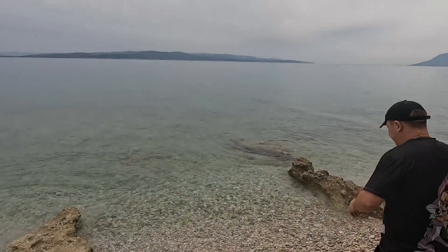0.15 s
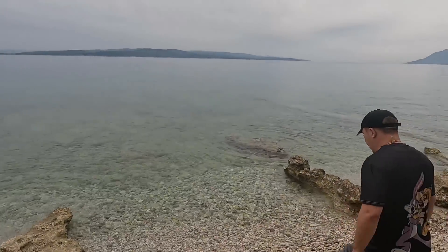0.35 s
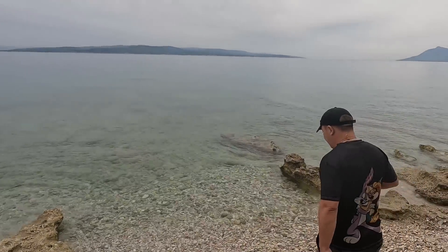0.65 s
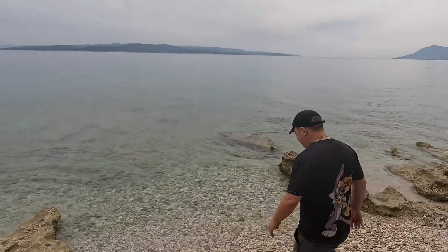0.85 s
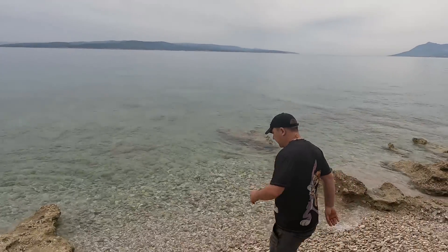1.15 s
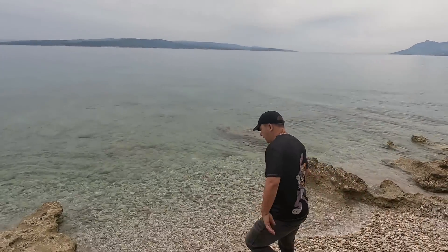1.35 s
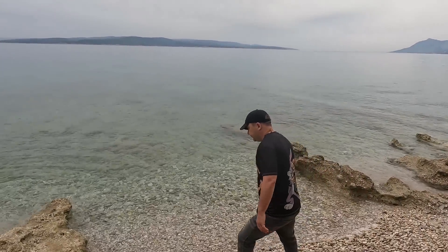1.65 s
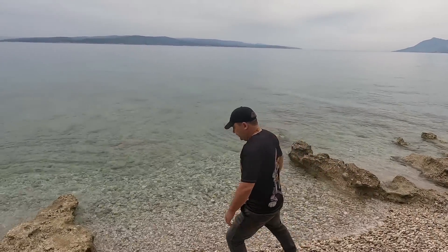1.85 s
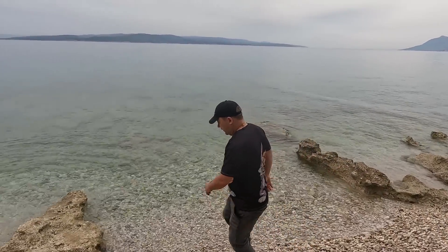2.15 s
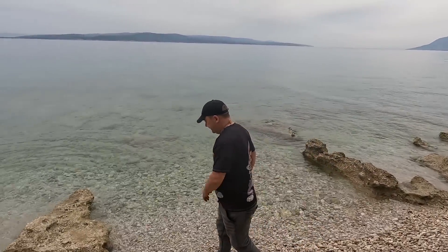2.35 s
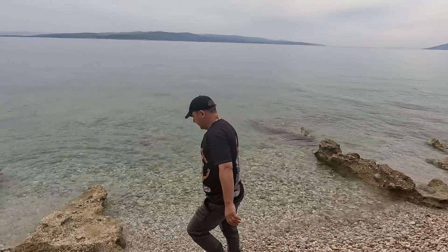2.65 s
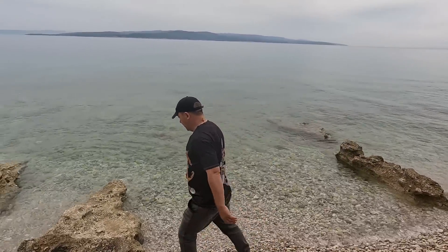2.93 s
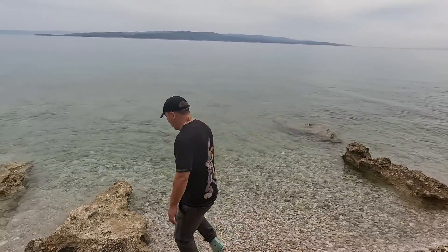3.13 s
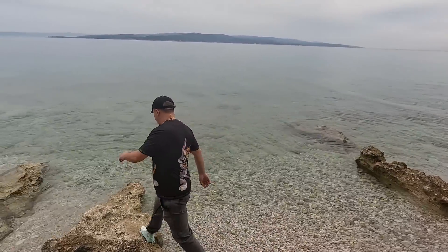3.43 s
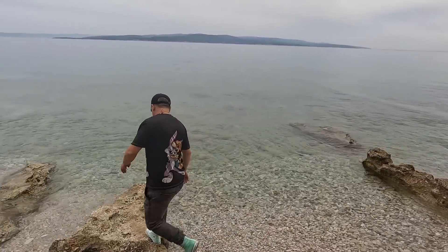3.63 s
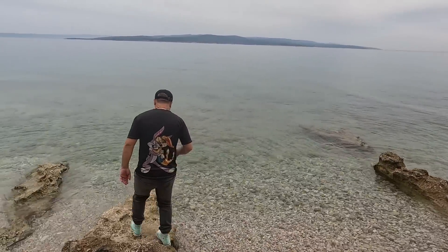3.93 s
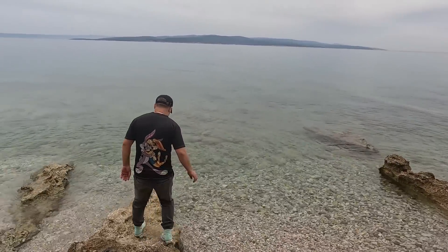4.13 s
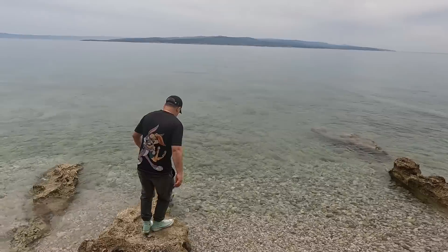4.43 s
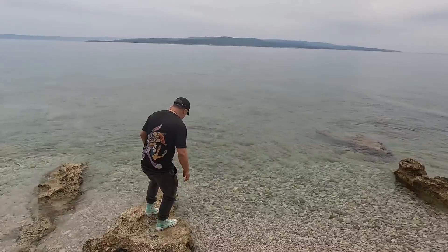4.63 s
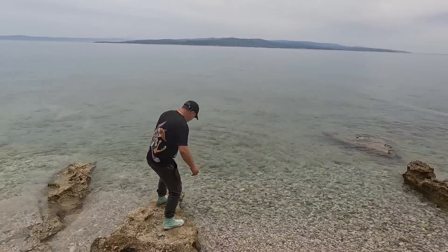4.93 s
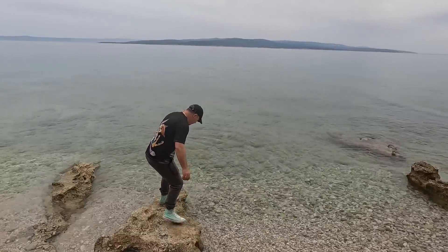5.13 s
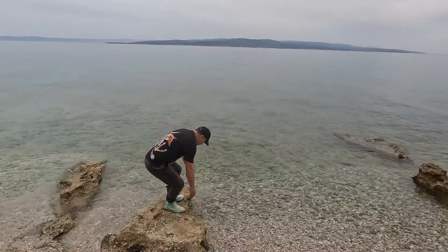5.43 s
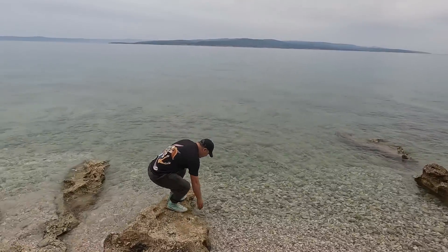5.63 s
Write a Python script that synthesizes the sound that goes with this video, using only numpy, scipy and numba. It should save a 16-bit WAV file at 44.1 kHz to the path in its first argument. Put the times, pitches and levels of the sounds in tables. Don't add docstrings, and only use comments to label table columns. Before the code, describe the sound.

Outdoors at the edge of a calm sea, heard through a small stereo camera. From 0 to about 2.7 seconds, shoes crunch busily over loose pebbles: dense, bright gritty rattling, with hard clicks, clacks and lower stone knocks, especially around 0.8, 1.1-1.3, 1.8-2.0 and 2.5 seconds. Gravel pours between treads, notably near 0.6 seconds. After a brief lull, another step grinds stones near 3.05 seconds; weaker crunches and clacks follow at 3.25 and 3.6, ending around 3.8 as the shoes rest on rock. The level then drops sharply. Small waves lap and gurgle, with hollow low sloshes around 4.3-4.8 and 5-5.4 seconds, ringing bubbles clustered near 4.5, and clear drips near 5.04 and 5.7. Fine foam fizz and tiny ticks continue over soft wash. Wind thuds low, strongest near 0.85 seconds, and a distant boat engine hums faintly.

```python
import sys
import numpy as np
from scipy import signal
from scipy.fft import rfft, irfft
from scipy.io import wavfile
from scipy.ndimage import uniform_filter1d
from numba import njit

SR = 44100
rng = np.random.default_rng(int(sys.argv[2]) if len(sys.argv) > 2 else 0)


def magnitude_from_level(level_db):
    exponent = np.asarray(level_db, float) / 20
    return 10 ** exponent


def materialize(psi):
    bounded = np.clip(np.atleast_2d(psi).T, -1, 1)
    quanta = np.round(bounded * 32767).astype(np.int16)
    wavfile.write(sys.argv[1], SR, quanta)


N = 254898
TIME = np.arange(N) / SR
FREQ = np.maximum(np.arange(N // 2 + 1) * SR / N, 1.)

# frequency in Hz, level in dB per Hz.
STONE_TONE = [(290, 0), (500, 0), (688, 3.5), (831, -1.5), (1110, 3.5), (1820, 3), (3060, 2.5), (3750, 5),
              (4660, 2), (6330, 5), (7640, 5), (8580, -1), (10500, 4.5), (13400, -7), (16000, -33)]
# frequency in Hz, level in dB per Hz.
SEA_TONE = [(76, -58), (130, -32), (187, 0.5), (228, 0.5), (378, -8), (427, -11), (829, -11.5), (1080, -6),
            (1320, -4.5), (3910, -15), (5180, -27), (7150, -17.5), (8230, -25), (12100, -29), (16000, -53)]


def across(table, hz):
    table_hz, value = np.transpose(table)
    return np.interp(np.log(hz), np.log(table_hz + 1e-9), value)


def band(x, lo_hz, hi_hz, order=4):
    loss = (1 + (lo_hz / FREQ) ** (2 * order)) * (1 + (FREQ / hi_hz) ** (2 * order))
    y = irfft(rfft(x) / np.sqrt(loss), N)
    return y / np.sqrt(np.mean(y[0] ** 2))


def colour(x, table):
    spec = rfft(x)
    own = uniform_filter1d(np.abs(spec[0]) ** 2, size=1500)
    return irfft(spec * magnitude_from_level(across(table, FREQ)) / np.sqrt(own + 1e-12), N)


def walk(rate_hz):
    hold = int(SR / rate_hz)
    levels = np.repeat(rng.standard_normal(N // 40), hold)[:N]
    return uniform_filter1d(levels, hold // 2 + 1)


def swells(table, db, rest_db):
    s, rise, fall = np.transpose(table)[:3, :, None]
    t = TIME[::32]
    before = (s - t) / np.maximum(rise, .004)
    after = (t - s) / np.maximum(fall, .004)
    away = np.where(t < s, before, after)
    event_db = np.asarray(db)[:, None] - 10 * away ** 1.6
    power = np.sum(magnitude_from_level(2 * event_db), axis=0) + magnitude_from_level(2 * rest_db)
    return np.interp(TIME, t, 10 * np.log10(power))


@njit
def ring(start, hz, cycles, rise, size, side):
    out = np.zeros((2, N))
    for g in range(len(start)):
        length = cycles[g] * SR / hz[g]
        turn = np.exp(2j * np.pi * hz[g] / SR - 4 / length)
        bend = np.exp(2j * np.pi * hz[g] * rise[g] / SR / length)
        z = size[g] + 0j
        onset, fade = 1., np.exp(-25 / length)
        for i in range(start[g], min(start[g] + int(1.5 * length), N)):
            onset *= fade
            out[0, i] += z.imag * (1 - onset)
            out[1, i] += z.imag * (1 - onset) * side[g]
            z *= turn
            turn *= bend
    return out


def swarm(count, lo_hz, hi_hz, cycles, scatter_db, busy, rise=0., order=1, pitch=None):
    u = rng.random((count, 4 + 2 * order))
    start = (u[:, 0] * (N - 200)).astype(np.int64)
    share = np.clip(busy[start], .05, 1)
    above = np.minimum(-np.log(1 - u[:, 1]), 5.5)
    size = magnitude_from_level(scatter_db * above) * (u[:, 2] < share) / np.sqrt(share)
    hz = lo_hz * (hi_hz / lo_hz) ** u[:, 4:4 + order]
    if pitch is not None:
        hz = hz * pitch[start, None]
    delay = (40 * u[:, 4 + order:]).astype(np.int64)
    each = np.ones((count, order))
    side = np.sqrt(12) * (u[:, 3:4] - .5) * each
    climb = rise * (2 * u[:, 3:4] * each) ** 2
    turns = cycles * (.5 + u[:, 4 + order:])
    keep = np.repeat(size > 0, order)
    grains = (start[:, None] + delay, hz, turns, climb, size[:, None] * each, side)
    return ring(*(a.ravel()[keep] for a in grains))


def pebbles():
    # peak in seconds, rise and fall in seconds per 10 dB,
    # level in dB, brightness in dB.
    treads = [(0.0, 0.022, 0.11, -21, -0.5), (0.293, 0.084, 0.13, -20, 0),
              (0.382, 0.095, 0.12, -20.5, -2.5), (0.77, 0.051, 0.036, -22.5, 7),
              (0.849, 0.087, 0.096, -17, 1.5), (0.95, 0.067, 0.047, -19, -3.5),
              (1.081, 0.055, 0.11, -32, -5.5), (1.142, 0.012, 0.25, -23, 6), (1.27, 0.076, 0.12, -21, -3),
              (1.45, 0.18, 0.064, -21.5, 2.5), (1.55, 0.083, 0.24, -24.5, -1),
              (1.826, 0.013, 0.055, -22, 1.5), (1.98, 0.15, 0.12, -30, -5),
              (2.142, 0.14, 0.15, -25.5, -2.5), (2.266, 0.21, 0.055, -29.5, -8),
              (2.48, 0.038, 0.046, -22, -1.5), (2.559, 0.17, 0.15, -29.5, -0.5),
              (2.739, 0.13, 0.056, -30.5, -6.5), (2.9, 0.19, 0.3, -38, -12.5),
              (3.044, 0.058, 0.15, -21, -5.5), (3.25, 0.045, 0.062, -27.5, -6.5),
              (3.45, 0.148, 0.17, -38.5, -11), (3.652, 0.098, 0.034, -28, -1),
              (3.739, 0.041, 0.021, -46.5, 8.5)]
    # peak, rise and fall in seconds, level in dB.
    spills = [
        (0.222, 0.011, 0.038, -33),
        (0.57, 0.078, 0.17, -21.5),
        (1.04, 0.11, 0.1, -26),
        (1.68, 0.3, 0.15, -31),
        (1.93, 0.038, 0.13, -41),
        (2.44, 0.024, 0.035, -19),
        (2.68, .06, 0.043, -51),
        (3.338, 0.012, 0.034, -40),
    ]
    # peak, rise and fall in seconds, level in dB, pitch in Hz.
    shifts = [
        (0.0, .05, 0.071, -59, 255),
        (0.35, 0.063, 0.15, -27, 424),
        (0.83, 0.093, .13, -25.5, 364),
        (1.08, 0.078, 0.2, -29.5, 312),
        (1.54, 0.14, 0.03, -31, 440),
        (2.05, .04, 0.18, -43, 265),
        (2.5, 0.19, 0.05, -41, 291),
        (2.8, 0.12, 0.12, -33, 384),
        (3.055, 0.37, 0.77, -38, 367),
        (3.59, .05, 0.043, -40, 231),
    ]
    db, bright = np.transpose(treads)[3:]
    spill_db = np.transpose(spills)[3]
    shift_s = np.transpose(shifts)[0]
    shift_db, shift_hz = np.transpose(shifts)[3:]
    surface = np.vstack([np.array(treads)[:, :3], np.array(spills)[:, :3]])
    deep = np.vstack([treads, shifts])

    grit_db = swells(surface, np.append(db - 0.5 + 0.83 * bright, spill_db), rest_db=-51)
    small_db = swells(surface, np.append(db + 0.5 + 0.4 * bright, spill_db - 17), rest_db=-48.0)
    large_db = swells(treads, db - 2.5 - 0.58 * bright, rest_db=-38.5)
    cobble_db = swells(deep, np.append(db - 10.5 - 0.047 * bright, shift_db - 5.5), rest_db=-49.5)
    bed_db = swells(deep, np.append(db - 14, shift_db), rest_db=-63.0)
    bed_hz = np.interp(TIME, shift_s, shift_hz)

    stop = np.clip((3.78 - TIME) / 0.056, 0, 1)
    lifted = np.clip((3.7 - TIME) / 0.025, 0, 1)
    busy = magnitude_from_level(.4 * (small_db + 19))
    slips = magnitude_from_level(0.9 * walk(70))
    heap = swarm(count=60000, lo_hz=317.0, hi_hz=14100, cycles=9.1, scatter_db=2.0, busy=busy, order=4)
    stones = colour(heap, STONE_TONE)
    bed = swarm(count=5000, lo_hz=234.0, hi_hz=483, cycles=2.9, scatter_db=-1.5,
                busy=busy + 0.26, pitch=bed_hz / 300)
    rolling = magnitude_from_level(grit_db) * band(stones, 6300, 20000)
    rolling += magnitude_from_level(small_db) * band(stones, 2600, 6300)
    rolling += magnitude_from_level(large_db) * band(stones, 920, 2600)
    rolling += lifted * magnitude_from_level(cobble_db) * band(stones, 520, 920)

    strays = swarm(count=700, lo_hz=1840, hi_hz=13800, cycles=5.2, scatter_db=5.0, busy=np.ones(N), order=7)
    strays = band(colour(strays, STONE_TONE), 800, 20000, order=2) * [[1], [.5]]
    rolling += magnitude_from_level(-11.5 + np.maximum(grit_db, small_db)) * strays
    return stop * (slips * rolling + lifted * magnitude_from_level(bed_db) * band(bed, 140, 1100))


def sea_wash():
    froth = swarm(count=9000, lo_hz=300.0, hi_hz=11330, cycles=17.0, scatter_db=3.5, busy=np.ones(N), rise=0.1)
    hiss = rng.standard_normal((2, N)) * np.array([[1], [1.5]])
    wash = colour(froth / np.std(froth[0]) + 1.4 * hiss, SEA_TONE)
    return wash * magnitude_from_level(-43 + 0.5 * walk(14.0)) / np.std(wash[0])


def boat():
    # time in seconds, level in dB.
    engine = [(0.0, -39), (0.3, -39), (0.9, -46.5), (2.14, -49), (2.48, -44), (3.51, -64), (4.07, -58),
              (4.36, -44), (4.99, -51.5), (5.39, -45.5), (5.78, -55)]
    s, db = np.transpose(engine)
    second_db = np.interp(TIME, s, db)
    turn = 2 * np.pi * np.cumsum(30.37 * (1 + 0.01643 * walk(3.8))) / SR
    hum = np.zeros(N)
    for multiple, below_db in [(2, 0), (3, 4), (6, 9), (12, 16)]:
        hum += magnitude_from_level(second_db - below_db + 2. * walk(7.2)) * np.sin(multiple * turn + multiple)
    rumble = magnitude_from_level(-49.5) * band(rng.standard_normal((2, N)), 40, 203, order=3)
    return rumble + np.array([1.44 * hum, .3 * hum])


def wind():
    # peak, rise and fall in seconds, level in dB.
    gusts = [(0.0, .05, 0.045, -21), (0.5, 0.43, 0.072, -30), (0.845, 0.016, 0.072, -13),
             (1.15, 0.7, 0.17, -32.5), (1.53, 0.13, 0.26, -33), (2.11, 0.39, .15, -28.5),
             (2.82, 0.38, 1, -37.5), (3.9, 0.29, 0.19, -43), (4.28, 0.047, 0.15, -32),
             (4.68, 0.043, 0.055, -32), (5.44, 0.077, 1, -40.5)]
    buffet = band(rng.standard_normal((2, N)), 10, 28, order=3)
    gust = magnitude_from_level(swells(gusts, np.transpose(gusts)[3], rest_db=-49.5)) * buffet
    return np.array([0.74 * gust[0] + 0.13 * gust[1], 1.53 * gust[0] - 0.18 * gust[1]])


def rattles():
    # time in seconds, length in seconds, level in dB, pitch in Hz.
    pockets = [(.29, 0.062, -19, 3600), (0.34, 0.066, -19, 2850), (0.36, 0.058, -21.5, 700),
               (.39, 0.095, -22.5, 1270), (0.38, .05, -23, 3300), (0.84, 0.068, -18, 2500),
               (.83, 0.089, -21, 4500), (0.846, 0.069, -17.5, 1050), (0.92, 0.076, -18, 1020),
               (1.068, 0.034, -27.5, 760), (1.2, 0.054, -19, 3900), (1.28, 0.077, -21, 1430),
               (1.277, 0.048, -20, 2000), (1.42, 0.11, -21, 1426), (1.378, 0.11, -23.5, 715),
               (2.14, 0.092, -26, 1120), (2.219, 0.064, -27, 1750), (2.8, 0.034, -36, 1360),
               (3.1, .04, -27.5, 390), (2.831, 0.022, -23, 373), (2.858, 0.057, -27.5, 1400),
               (2.9, .03, -27.5, 410), (2.957, 0.0179, -25, 465), (2.98, 0.029, -22.5, 1900),
               (3.051, .06, -19, 1000), (3.141, 0.044, -22, 1020), (3.13, 0.042, -23, 586),
               (3.413, 0.042, -30.5, 1200), (3.626, 0.051, -31, 2560), (3.641, 0.044, -24.5, 1050),
               (3.933, .12, -38.5, 2290), (4.7, .08, -47, 1100), (4.528, .04, -32, 300),
               (4.65, 0.062, -41, 315), (4.2, 0.046, -44, 1000), (4.37, .1, -40.5, 684),
               (5.17, 0.048, -42.5, 1150), (5.43, 0.047, -46, 1250), (5.553, .05, -41.5, 1300),
               (4.658, .006, -32, 4050), (4.51, .03, -33, 720), (3.07, .12, -26, 330),
               (5.27, .04, -46, 300), (3.0, .03, -32, 180), (2.19, .1, -26, 1050), (5.03, 0.067, -41, 2330)]
    # time in seconds, peak in dB, pitch in Hz.
    chips = [(0.0997, -9.5, 3610), (0.166, -22, 1270), (0.1795, -16, 2200), (0.2174, -18, 1870),
             (0.3254, -9, 2920), (0.5651, -21, 3475), (0.7194, -20, 2840), (0.7407, -14, 1840),
             (0.7487, -11, 1370), (1.1099, -12, 3270), (1.1363, -11, 3437), (1.1513, -8, 3250),
             (1.4182, -7, 1995), (1.4576, -11, 1050), (1.4664, -7, 1620), (1.5399, -13, 3330),
             (1.6501, -12.5, 950), (1.6794, -17, 1320), (1.7564, -11.5, 3380), (1.8153, -7, 2300),
             (1.9674, -15, 1770), (2.0173, -16, 1710), (2.2697, -7.5, 1100), (2.3565, -17, 1420),
             (2.4269, -10, 1890), (2.5584, -16, 2270), (2.6424, -17, 2320), (2.7322, -9, 3520),
             (2.8632, -13.5, 3300), (2.818, -23, 1800), (2.8424, -19, 1500), (2.8628, -10.5, 2000),
             (2.9522, -13, 1680), (2.9674, -13, 1740), (3.0054, -15, 2590), (3.367, -22, 750),
             (3.4034, -23, 2200), (3.5808, -15, 1040), (3.6057, -12, 3620), (3.6247, -11, 2370),
             (5.0143, -26, 1300), (4.9602, -25, 3500)]
    s, length, db, hz = np.transpose(pockets)[:, :, None]
    z = rng.standard_normal((len(pockets), 4, 24)).transpose(1, 0, 2)
    start = ((s + .5 * length * z[0]) * SR).astype(np.int64)
    pitch = hz * (1 + 0.066 * np.sqrt(1500 / hz) * z[1])
    cycles = 17.2 * np.sqrt(pitch / 1500)
    size = magnitude_from_level(db + 2.3 * z[2]) * np.sqrt(length * pitch / cycles / 3)
    side = 0.48 * z[3]
    chatter = ring(start.ravel(), pitch.ravel(), cycles.ravel(), 0 * pitch.ravel(), size.ravel(), side.ravel())
    s, db, hz = np.transpose(chips)
    return chatter + ring((s * SR).astype(np.int64), hz, 2.9 + 0.0079 * hz, 0 * s, magnitude_from_level(db), 0 * s)


def knocks():
    # time in seconds, peak in dB, ring in Hz.
    clicks = [(0.1003, 6, 7300), (0.26, -8, 4670), (0.522, -3, 10700), (0.5364, -7, 10900),
              (0.5659, 0, 7440), (0.6048, -3, 11770), (0.6285, -1, 7360), (1.111, -9, 7200),
              (1.1518, 5, 5460), (1.1665, 3, 7490), (1.2673, 4, 7400), (1.3132, 6.5, 7100),
              (1.5415, -1, 7040), (1.6487, 2, 6800), (1.8254, 2, 5830), (1.8377, 5, 7450),
              (1.8095, 2, 6000), (1.9076, -2, 7300), (1.924, 0.5, 4860), (1.9615, 4, 7450),
              (2.036, -3, 5590), (2.058, -1.5, 4980), (2.7374, -6, 6500), (2.776, -11.5, 9900),
              (2.906, -15, 5530), (2.9123, -15, 7440), (3.4034, -16, 4330), (3.4608, -17, 7490),
              (3.8716, -14, 10300), (4.5226, -24.5, 6400)]
    # time in seconds, peak in dB, ring in Hz.
    clacks = [(0.588, -2, 7750), (0.6862, -3, 9000), (1.103, -2, 6490), (1.1378, 2, 6300),
              (1.3244, 4, 4080), (1.7076, 2, 6330), (1.7402, 0, 5730), (1.8153, 6, 6840),
              (1.9684, 1.5, 6000), (2.0184, 7, 6850), (2.27, 3.5, 7300), (2.3565, -11, 4200),
              (2.402, -5, 7060), (2.4262, -2, 7240), (2.4763, 9, 5940), (2.61, -5, 4150),
              (2.6766, -1.5, 4300), (2.725, -4, 4340), (2.7329, 1.5, 6460), (2.8182, -9, 3870),
              (2.8437, -11, 4160), (2.8628, -12, 3200), (2.9528, -2, 4260), (3.059, 6, 4430),
              (3.279, -8, 4510), (3.4695, -10, 4480), (3.583, -8, 4000), (3.6074, -3, 4020),
              (3.903, -19, 4400), (5.7351, -25, 7560)]
    # time in seconds, peak in dB, ring in Hz.
    ticks = [(0.178, -17, 6930), (0.2143, -9, 10500), (0.2188, -10, 7660), (0.9453, -3, 5140),
             (1.196, 2, 6200), (1.2045, 1, 6240), (1.218, 1, 5500), (1.5686, -3.5, 6310),
             (1.793, -10, 6020), (1.9016, -9, 7040), (2.3094, -16, 6590), (2.381, -17.5, 9450),
             (1.6696, -4, 6120), (2.8843, -19, 5510), (2.978, -24, 4350), (2.9896, -20, 6680),
             (2.9985, -13, 9760), (3.0185, -6, 4550), (3.3436, -13, 6590), (3.5166, -27, 6730),
             (3.5369, -23, 5730), (3.5468, -15, 4470), (3.6262, -17, 4240), (3.7299, -33, 6980),
             (3.7387, -24, 6480), (3.7773, -29, 11000), (3.8312, -36, 7160), (3.7469, -26, 3900),
             (4.0457, -27, 6500), (4.0866, -27, 6670), (4.1074, -29, 3700), (4.4233, -34, 6500),
             (4.3104, -33, 7140), (4.3483, -29, 6900), (4.5388, -29, 6120), (4.47, -32, 7220),
             (4.7351, -35, 6730), (4.9477, -34, 6280), (4.9978, -35, 6850), (5.1549, -35, 10300),
             (5.2187, -32, 7250), (4.9013, -32, 4000), (4.9601, -33, 3900), (5.3333, -39, 7440),
             (5.4046, -31, 6360), (5.4116, -28, 7400), (5.4779, -33, 7120), (5.639, -32, 6760),
             (5.678, -33, 6950), (5.6847, -29, 7800), (5.7424, -33, 10200), (5.7486, -23.5, 8650)]
    # time in seconds, peak in dB, pitch in Hz.
    thumps = [
        (0.937, -19, 224),
        (1.458, -13, 229),
        (2.741, -18, 373),
        (3.441, -25, 254),
        (3.581, -26, 194),
    ]
    s, db, ring_hz = np.vstack([clicks, clacks, np.add(ticks, [0, 4, 0])]).T
    tilt_db = np.repeat([4, -2, 2], [len(clicks), len(clacks), len(ticks)])
    u = rng.random((len(s), 21))
    spray_hz = 1000 + 1230 * (np.arange(10) + u[:, :10])
    hz = np.column_stack([ring_hz, spray_hz])
    share_db = np.append([-11., -21.], np.full(9, -14.))
    size = magnitude_from_level(db[:, None] + across(STONE_TONE, hz) + share_db)
    size *= magnitude_from_level(tilt_db[:, None] * np.log2(hz / 5000))
    delay = np.column_stack([8 + 0 * s, 45 * u[:, 10:20]])
    start = (s[:, None] * SR + delay).astype(np.int64)
    side = 1.4 * (u[:, 20:] - .5) + 0 * hz
    cycles = .0013 * hz + 2
    burst = ring(start.ravel(), hz.ravel(), cycles.ravel(), 0 * hz.ravel(), size.ravel(), side.ravel())
    burst = irfft(rfft(burst) / (1 + (FREQ / 14900) ** 14), N)
    s, db, hz = np.transpose(thumps)
    return burst + ring((s * SR).astype(np.int64), hz, 10.0 + 0 * s, 0 * s, magnitude_from_level(db), 0 * s)


def scatter(x, wet_db, t60_s):
    t = np.arange(3000) / SR
    tail = rng.standard_normal(len(t)) * 10 ** (-3 * t / t60_s) * (t > .0006)
    tail *= magnitude_from_level(wet_db) / np.sqrt(np.sum(tail ** 2))
    return x + signal.fftconvolve(x, tail[None], axes=1)[:, :N]


def laps():
    # peak, rise and fall in seconds, gurgle in dB, hollow slosh in dB.
    waves = [(3.8, 0.064, 0.044, -41.5, -55), (4.091, 0.37, 0.19, -40, -61),
             (4.265, 0.029, 0.094, -40, -37), (4.51, 0.1, 0.17, -39, -41), (4.6, 0.066, 0.066, -53, -31.5),
             (4.665, 0.046, 0.03, -37, -38), (4.77, 0.049, 0.02, -45, -39), (4.845, 0.023, 0.036, -47, -35),
             (5.04, 0.12, 0.091, -42, -39.5), (5.44, 0.12, 0.058, -41.5, -39.5),
             (5.645, 0.015, 0.051, -58, -37.5)]
    # peak, rise and fall in seconds, level in dB.
    foam = [
        (3.79, 0.12, 0.22, -48.5),
        (4.09, 0.11, 0.096, -46.5),
        (4.52, 0.022, 0.087, -47),
        (4.91, 0.039, 0.12, -53),
        (5.42, 0.083, 0.076, -52),
        (5.76, 0.053, .1, -51),
    ]
    gurgle_db = swells(waves, np.transpose(waves)[3], rest_db=-74)
    slosh_db = swells(waves, np.transpose(waves)[4], rest_db=-67)
    fizz_db = swells(foam, np.transpose(foam)[3], rest_db=-54.5)
    heard = np.clip((TIME - 3.66) / 0.043, 0, 1)
    gurgle = swarm(count=9000, lo_hz=474.5, hi_hz=4550, cycles=15.0, scatter_db=1.0,
                   busy=magnitude_from_level(1.5 * walk(25) - 4.5), rise=0.255)
    fizz = swarm(count=7000, lo_hz=3120, hi_hz=15100, cycles=26.0, scatter_db=3.0, busy=np.ones(N), order=6)
    low_peak = 1 / np.abs(1 + 2j * (FREQ - 192) / 30)
    high_peak = 0.18 / np.abs(1 + 2j * (FREQ - 320) / 70)
    hollow = irfft(rfft(rng.standard_normal((2, N))) * (0.13 + low_peak + high_peak), N)
    water = magnitude_from_level(gurgle_db) * band(colour(gurgle, SEA_TONE), 580, 7500)
    water += magnitude_from_level(fizz_db) * band(colour(fizz, SEA_TONE), 4800, 20000)
    boom = np.sin(2 * np.pi * np.cumsum(188 * (1 + 0.037 * walk(22))) / SR)
    water += magnitude_from_level(slosh_db) * (0.69 * band(hollow, 130, 440) + 0.98 * boom)
    return heard * water


def bubbles():
    # time in seconds, peak in dB, pitch in Hz.
    water_rings = [(4.101, -27, 1370), (4.124, -28.5, 646), (5.638, -28, 1300), (4.247, -27, 1160),
                   (4.266, -25.5, 960), (4.301, -29, 650), (4.793, -31, 1100), (4.403, -25, 1080),
                   (4.418, -26, 640), (4.484, -21.5, 1230), (4.502, -20, 1045), (4.52, -22, 1580),
                   (4.544, -26, 1340), (4.564, -27, 1010), (4.582, -28, 1030), (4.642, -30, 1270),
                   (4.764, -30, 1700), (4.779, -30, 1700), (5.047, -25, 1030), (5.087, -19.5, 1840),
                   (5.261, -28, 1470), (5.3275, -26.5, 1000), (5.371, -30, 1190), (5.418, -26, 1180),
                   (5.532, -27, 1300), (5.574, -28, 1280), (5.628, -21.5, 1480),
                   (3.896, -33, 2180), (4.001, -28, 2470), (3.955, -30, 2200), (4.128, -27, 1700),
             (4.5231, -23, 2620), (4.787, -29, 2150), (4.8215, -27, 2380), (4.8925, -33, 4200),
             (5.046, -33, 4300), (4.9605, -30, 2960), (5.024, -24, 2200), (5.037, -18.5, 2660),
             (5.134, -22.5, 2140), (5.481, -32, 2510), (5.685, -22, 2370)]
    s, db, hz = np.array(water_rings).T
    side = 0.84 * rng.standard_normal(len(s))
    rise = .3 * rng.random(len(s))
    cycles = 20.5 * np.sqrt(hz / 1500)
    return ring((s * SR).astype(np.int64), 0.97 * hz, cycles, rise, magnitude_from_level(db), side)


def scene():
    # frequency in Hz, side minus mid in dB.
    width = [(60, -6), (200, -10), (700, -10), (1500, -11.5), (3000, -10), (6000, -16), (10000, -11.5),
             (15000, 1)]
    # frequency in Hz, left minus right in dB.
    tilt = [(60, -1.5), (300, -0.5), (2500, -0.8), (6000, -0.5), (9000, 1.5), (14000, 5.5)]
    # frequency in Hz, left behind right in radians.
    port_lag = [(100, .02), (700, 0.24), (2800, 0.66), (6000, 0.7), (11000, 0.11), (15000, 0.28)]
    shore = pebbles() + sea_wash() + boat() + rattles()
    shore += scatter(knocks(), wet_db=-5.0, t60_s=0.025)
    shore += laps() + bubbles()
    mid, spread = rfft(shore)
    spread = spread * magnitude_from_level(across(width, FREQ) - 1)
    lean = magnitude_from_level(across(tilt, FREQ) / 2) * np.exp(-.5j * across(port_lag, FREQ))
    return irfft(np.array([(mid + spread) * lean, (mid - spread) / lean]), N) + wind()


def top_cut(x):
    return signal.sosfilt(signal.butter(12, 16500, fs=SR, output="sos"), x)


def record(dry):
    ceiling = .95
    soft = ceiling * np.tanh(0.72 * dry / ceiling)
    hz, s, frames = signal.stft(soft, SR, nperseg=2048)
    edge_hz = 15850 - 345 * np.floor(5.5 * rng.random(len(s)) ** 1.6)
    mix = signal.istft(frames * (hz[:, None] < edge_hz), SR)[1][:, :N]
    return top_cut(mix)


dry = scene()
out = record(dry)
materialize(out)
```